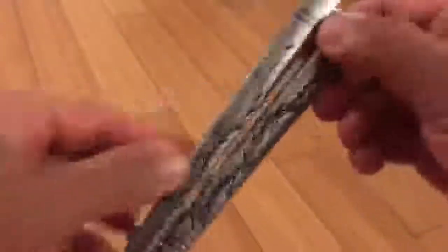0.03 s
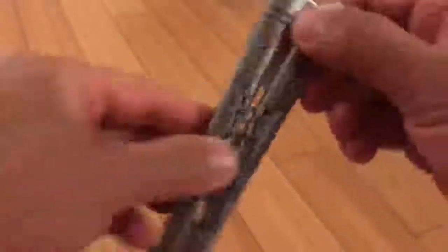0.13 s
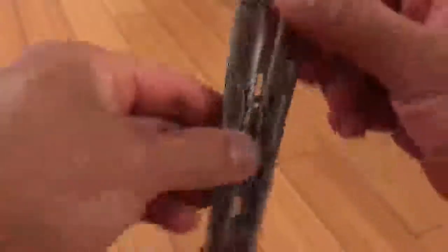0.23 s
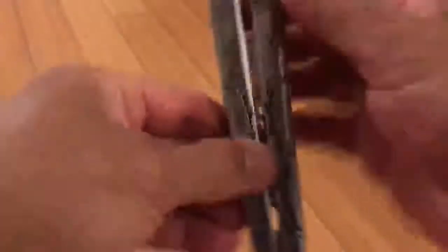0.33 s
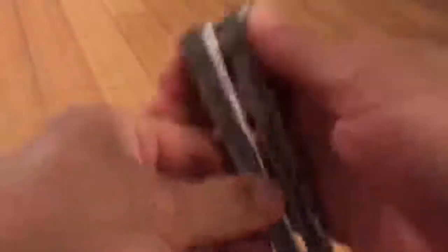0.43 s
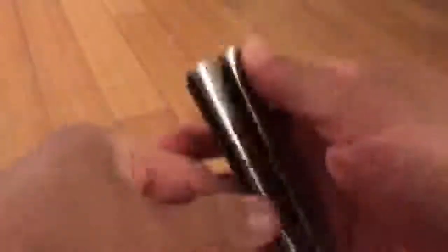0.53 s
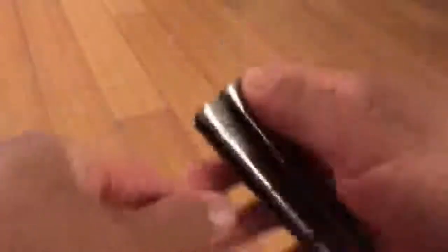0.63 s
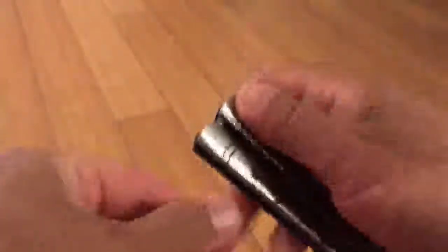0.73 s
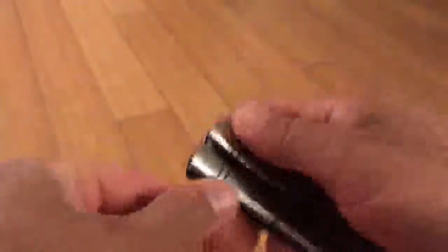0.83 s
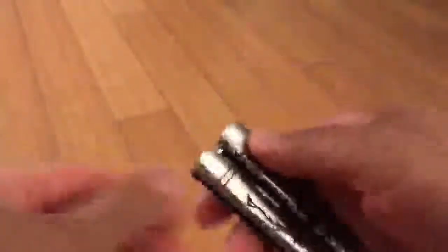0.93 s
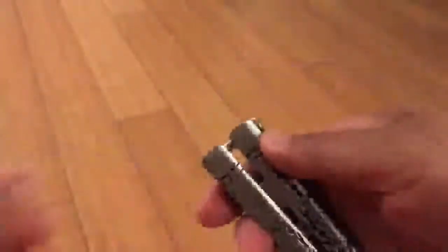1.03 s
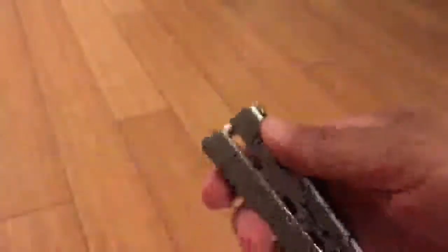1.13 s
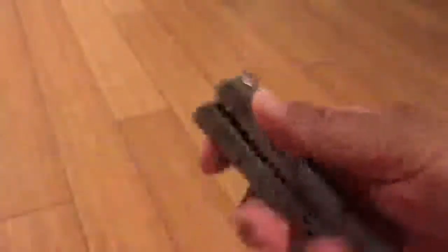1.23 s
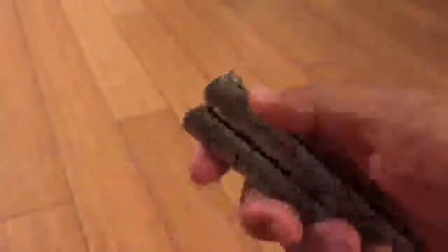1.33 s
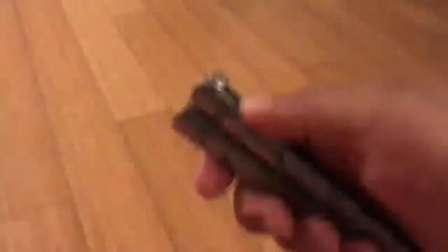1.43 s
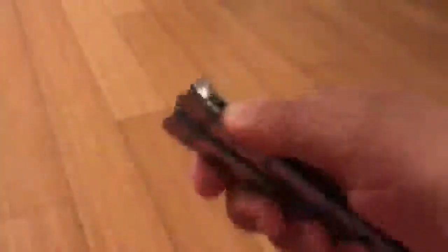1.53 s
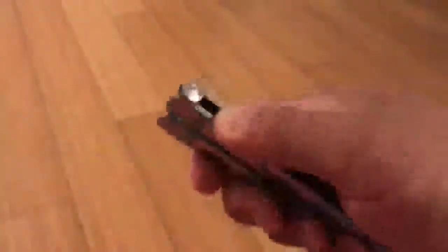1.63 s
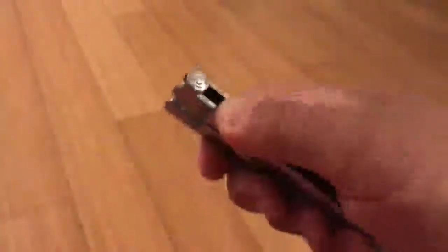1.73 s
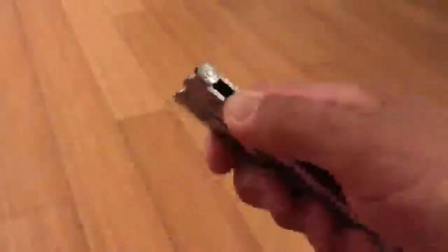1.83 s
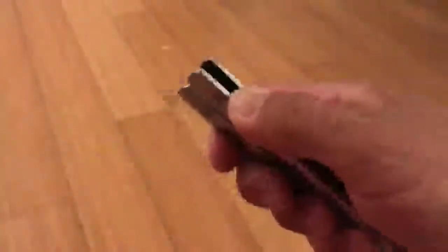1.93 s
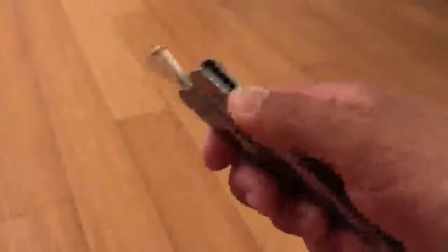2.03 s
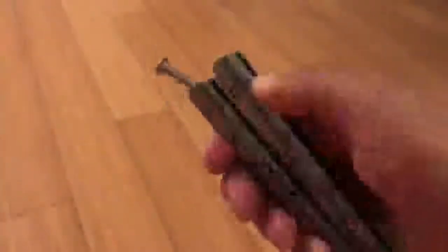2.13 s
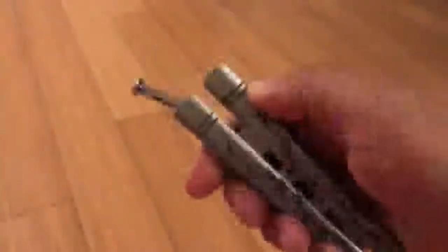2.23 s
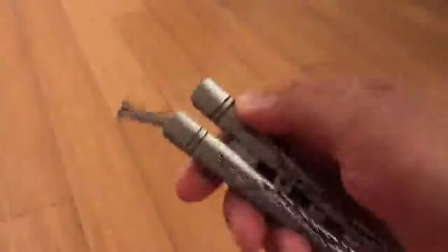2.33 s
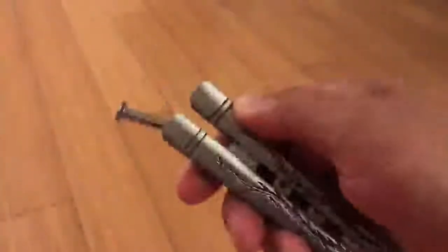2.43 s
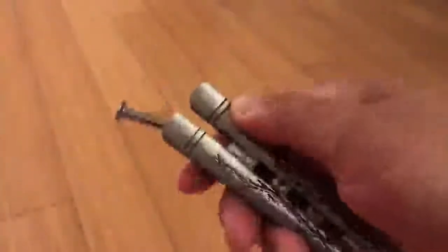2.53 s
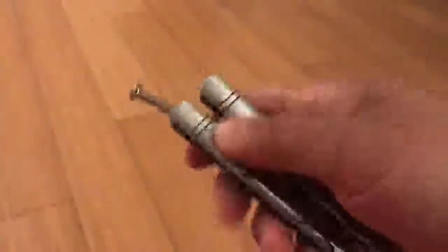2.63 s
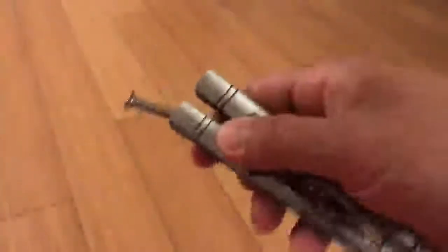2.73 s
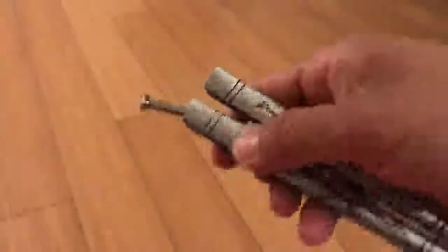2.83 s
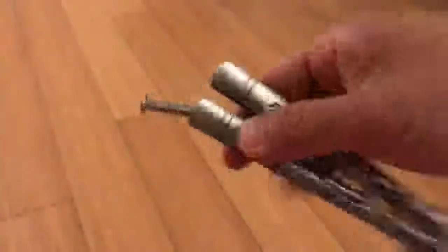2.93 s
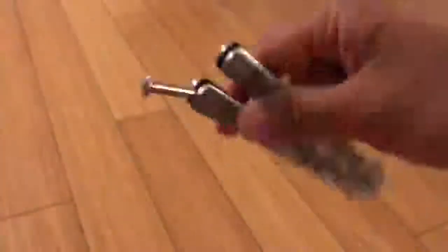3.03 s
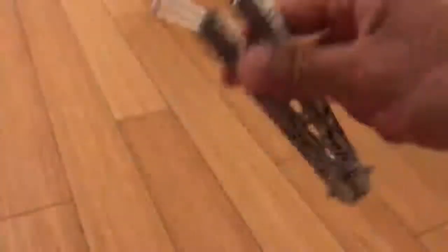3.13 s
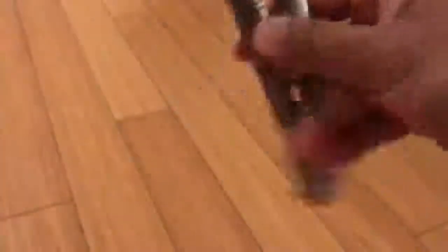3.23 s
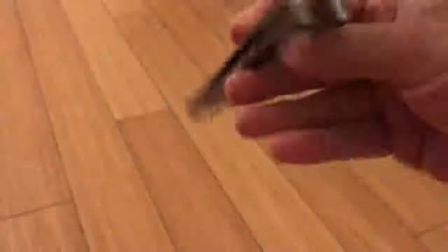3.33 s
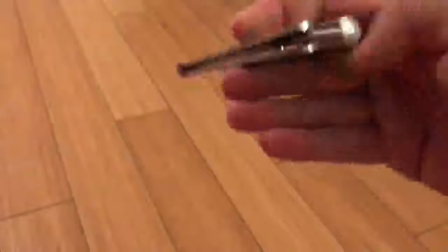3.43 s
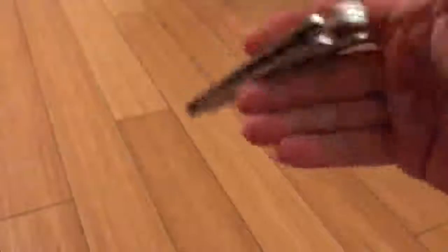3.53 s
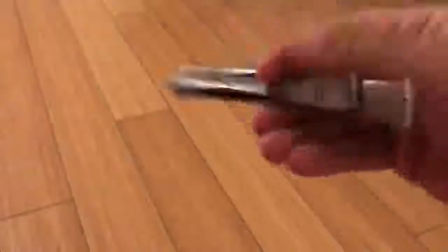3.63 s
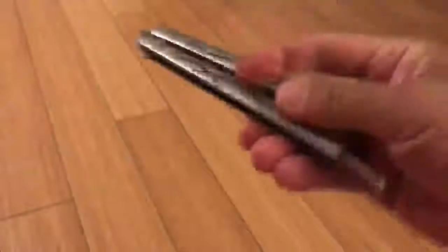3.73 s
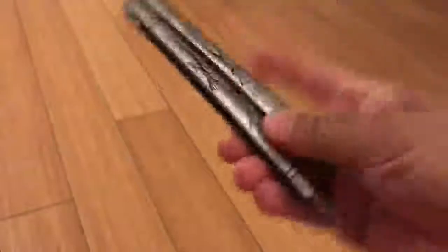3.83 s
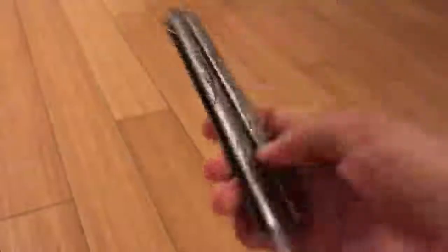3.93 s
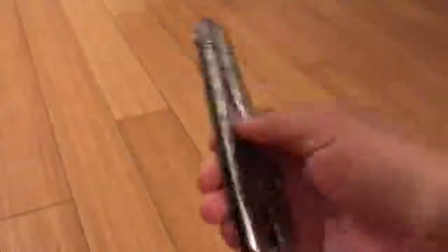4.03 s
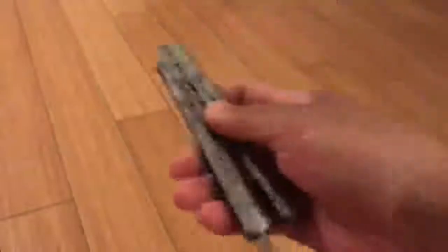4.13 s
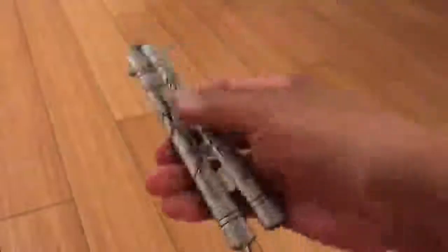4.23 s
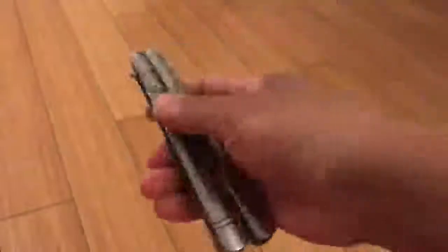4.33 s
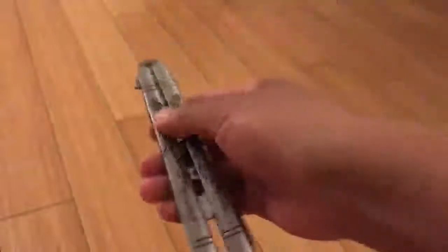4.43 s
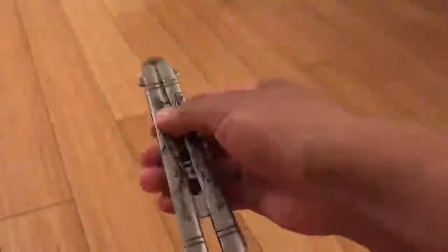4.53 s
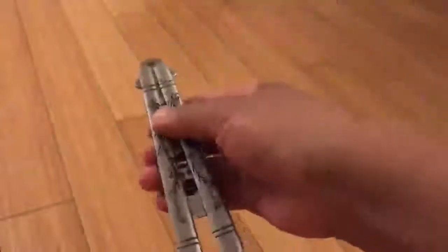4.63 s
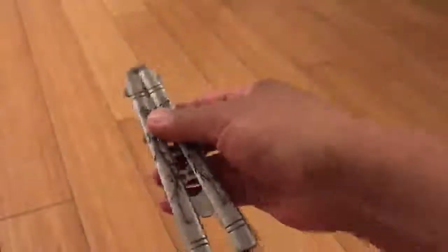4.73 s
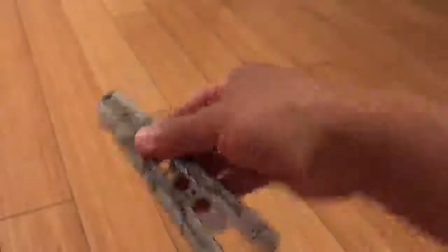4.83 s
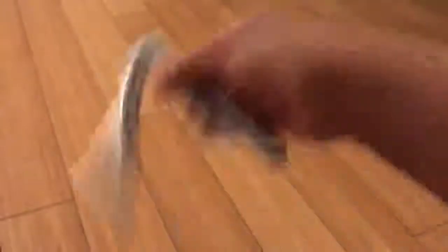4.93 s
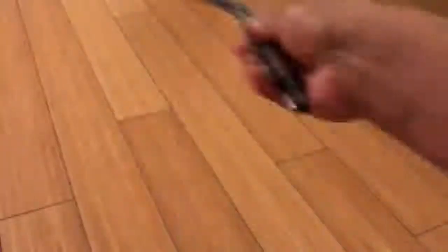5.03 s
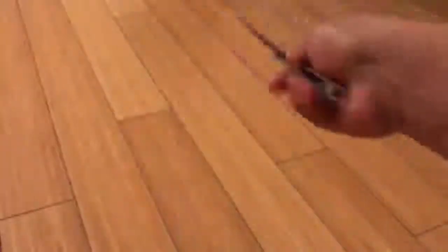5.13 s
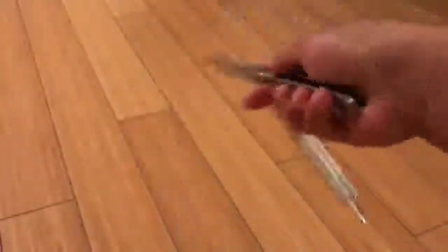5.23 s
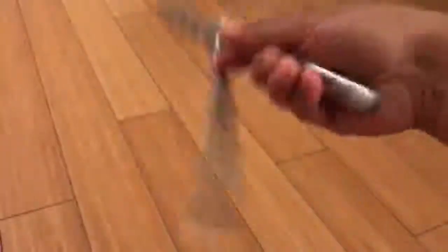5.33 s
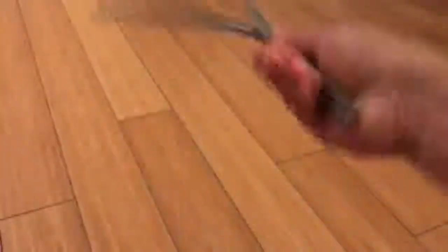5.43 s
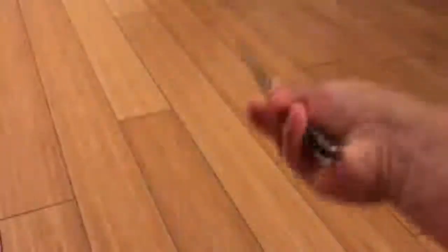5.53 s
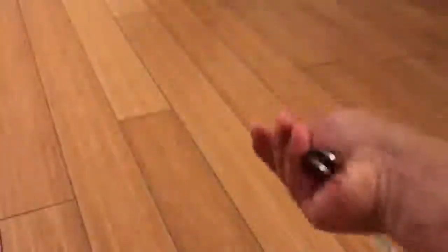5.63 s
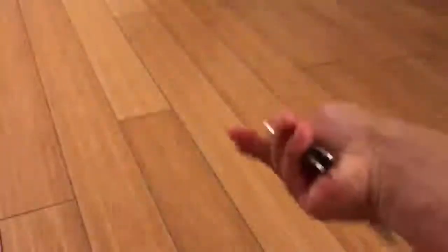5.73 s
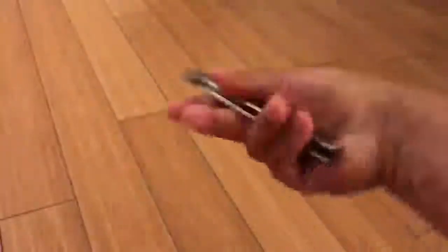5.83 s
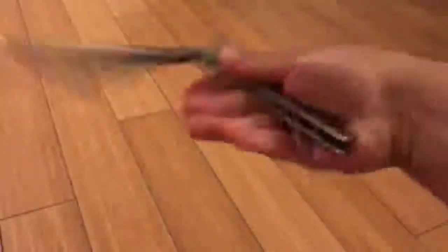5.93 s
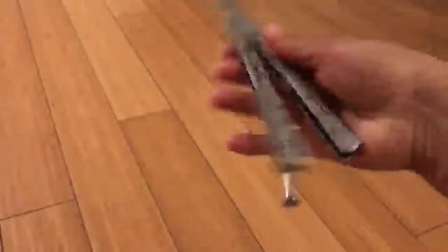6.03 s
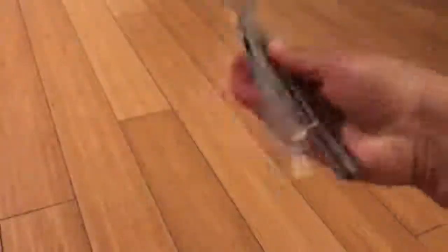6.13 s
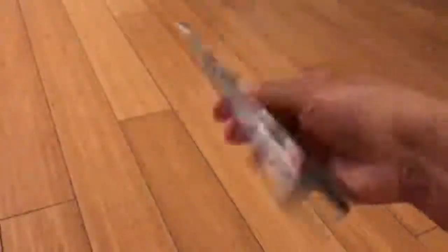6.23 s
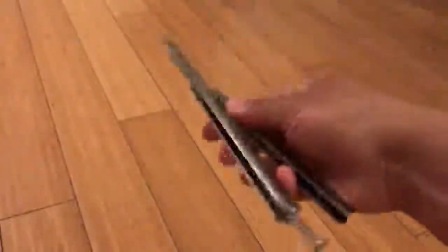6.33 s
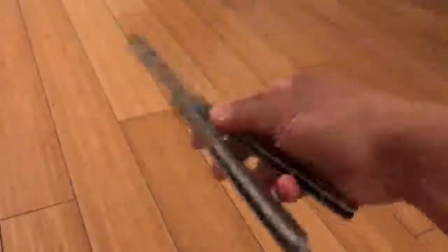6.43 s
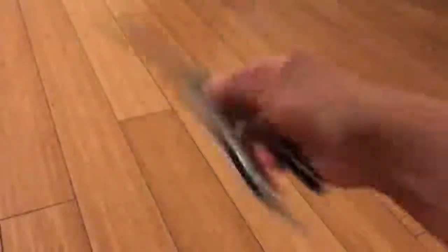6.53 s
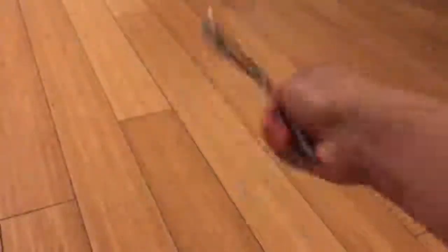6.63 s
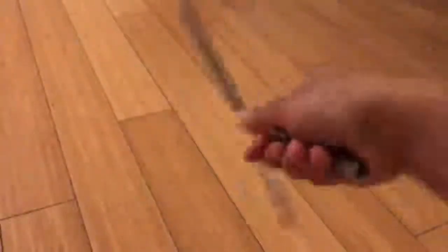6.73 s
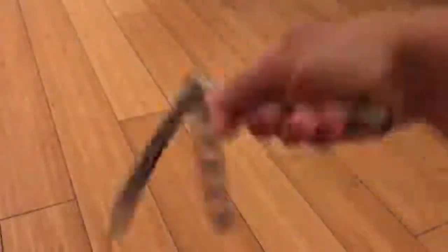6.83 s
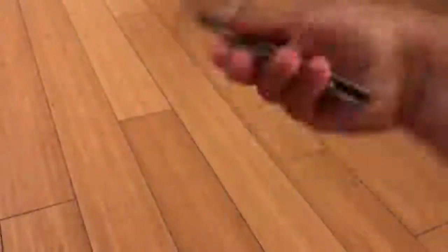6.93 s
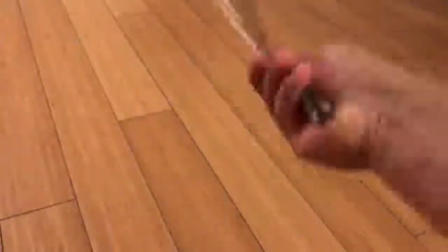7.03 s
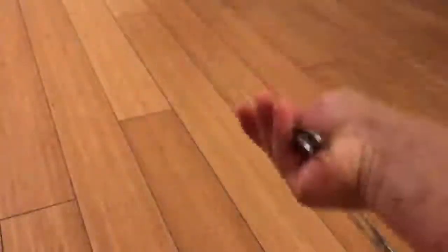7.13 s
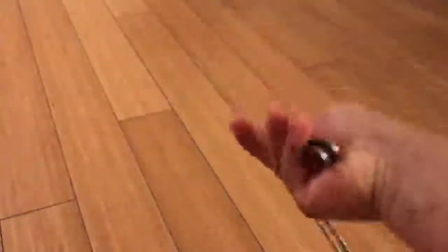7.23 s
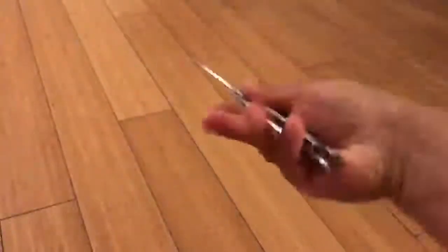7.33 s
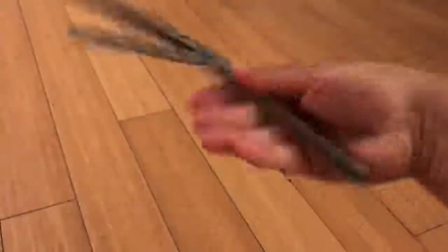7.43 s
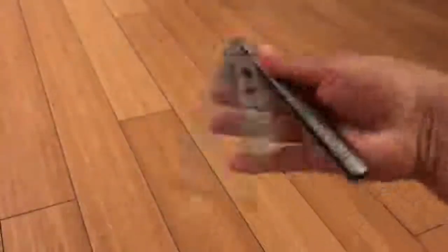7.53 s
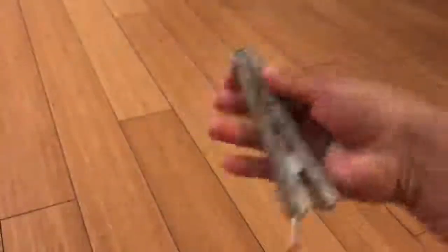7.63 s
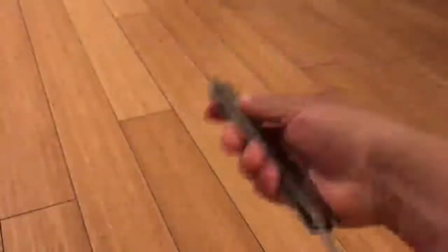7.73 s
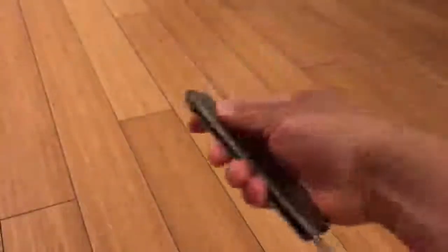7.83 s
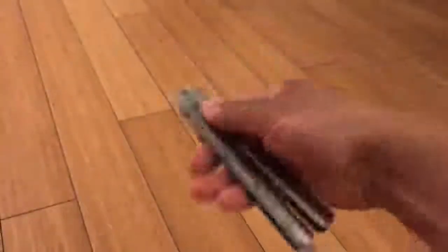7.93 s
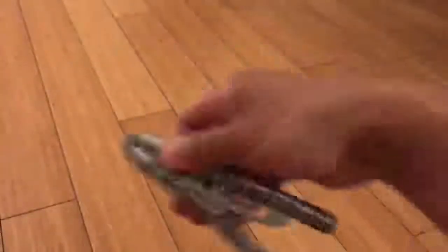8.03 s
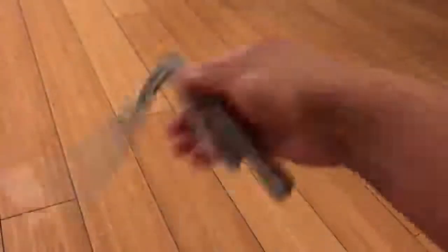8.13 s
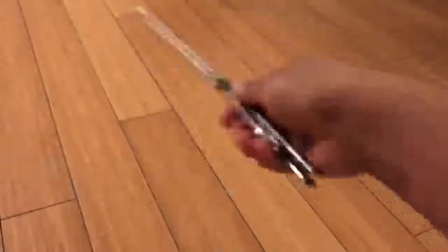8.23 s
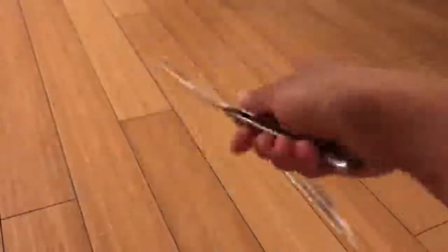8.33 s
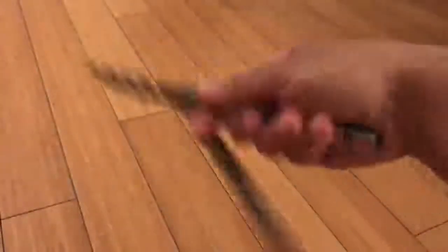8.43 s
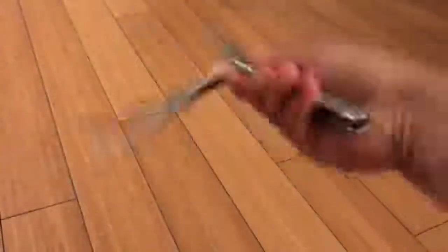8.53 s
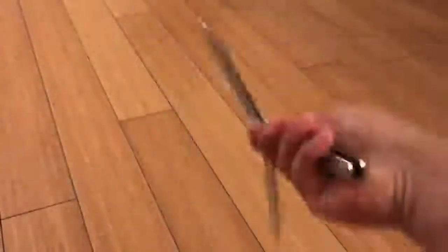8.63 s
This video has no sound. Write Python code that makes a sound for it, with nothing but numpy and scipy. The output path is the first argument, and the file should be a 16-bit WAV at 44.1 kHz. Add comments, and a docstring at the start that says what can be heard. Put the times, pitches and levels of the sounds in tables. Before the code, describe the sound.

Faint hum and finger rubbing on metal, a quick latch rattle, light ticks, then bursts of bright, dry steel clacks from flipping hinged handles.

```python
"""A steel practice butterfly knife is turned over, unlatched and flipped in one hand in a quiet room.
A faint hum, fingers rubbing the steel and short narrow-band tones run from the start; faint knocks and a dull
thud come near 1.5 s, then a quick flurry of knocks at 2 s: chattering contacts that ring damped modes.
Lighter knocks follow, then hard slams from 5.3 s on with a few more thuds between; the blade buzzes as
fading contacts after the slams at 5.3 and 7.2 s, and the last rub grows louder."""
import sys
import numpy as np
from scipy import signal
from scipy.fft import rfft, irfft
from scipy.io import wavfile
from scipy.ndimage import uniform_filter1d

SR = 44100
rng = np.random.default_rng(int(sys.argv[2]) if len(sys.argv) > 2 else 0)


def put_to_file(sound):
    """Save the sound as 16-bit audio at rate SR, in the file named by the first command-line argument."""
    columns = np.atleast_2d(sound).T  # one column per channel
    safe = np.clip(columns, -1, 1)
    whole_steps = np.round(safe * 32767)
    wavfile.write(sys.argv[1], SR, whole_steps.astype(np.int16))


N = 383669

# room noise spectrum: hz, level_db
AIR_SPECTRUM = [(12, -17), (25, -23.5), (50, 1.5), (113, 3.5), (163, -6), (301, -1.5), (513, -16),
                (574, -11), (698, -16.5), (1760, -24.5), (2910, -31), (4940, -41), (6360, -43),
                (7730, -51.5), (14700, -35), (16000, -36.5)]
AIR_DB = -58
# fuzzy hum bands: hz, pole_width_hz, level_db
HUM_BANDS = [(83, 30, -63.5), (122.5, 13.5, -64), (197.6, 5.9, -67), (279, 110, -75)]
# decay of the room: hz, t60_s
ROOM_DECAY = [(300, 0.34), (1500, 0.32), (3500, 0.22), (8000, 0.3), (15000, 0.21)]
ROOM_DB = -12.5
LATE_DB, LATE_T60_S = -15.5, 0.81  # weaker, slower second slope
# resonant bands that stand out of the tail: hz, width_hz, level_db (against the tail)
TAIL_BANDS = [(2740, 510, -0.5), (3660, 740, -8.5), (5460, 290, -7), (6670, 110, -1), (8980, 120, -6.5),
              (12800, 700, -6.5), (15400, 600, -3.5)]
EDGE_HZ = 16000

# hand shifting on the steel: time_s, level_db
RUB_LEVEL = [(0, -70.5), (.2, -68), (1.1, -69.5), (1.9, -71.5), (2.3, -61.5), (2.7, -70), (3.3, -70),
             (4.3, -67), (4.85, -70), (5.1, -64), (5.5, -60.5), (6.0, -67), (6.5, -65), (7.1, -60.5),
             (7.95, -61.5), (8.2, -60.5), (8.5, -53.5), (8.7, -53)]
# colour of the friction hiss: hz, level_db
FRICTION_SPECTRUM = [(700, 7.5), (2200, 7), (3200, 7.5), (4500, 4.5), (6400, 4.5), (8300, 1.5),
                     (11000, -0.5), (15500, -1.5), (16000, -24.5)]
RUB_TILT_DB_PER_OCTAVE, SLIDE_TILT_DB_PER_OCTAVE = -0.5, 5.5
# single light slides of a finger: start_s, length_s, level_db
FINGER_SLIDES = [(0.053, 0.23, -67), (0.358, 0.053, -60.5), (0.605, 0.2, -62), (0.947, 0.2, -68),
                 (1.2, 0.12, -69), (1.735, .06, -65), (2.764, 0.049, -64), (3.142, 0.097, -59),
                 (3.28, 0.2, -60), (3.522, 0.093, -59), (4.0, 0.11, -64), (4.41, 0.072, -60),
                 (5.594, 0.13, -52.5), (6.122, 0.24, -55), (8.39, 0.044, -47)]
SLIDE_RISE_S, SLIDE_FADE_DB = 0.018, -13.5
# modes fed by the rubbing: hz, level_db (against the rub)
RUBBED_MODES = [(2230, -19), (2950, -13), (3700, -20), (4300, -15), (5400, -20), (6400, -15), (7000, -25),
                (8300, -20)]
STRAND_WIDTH_HZ, STRAND_SLOWNESS_S, STRAND_SWING_DB, STRAND_DRIFT_SHARE = 280, .05, 5, .03
STRAND_STEP_S = .01
# friction whistles, latch ringing, a slam ringing on: start_s, length_s, level_db, pitch_hz
NARROW_TONES = [(0.238, 0.062, -70, 2150), (2.042, 0.16, -50, 7030), (2.07, 0.1, -56.5, 2290),
                (2.077, 0.019, -63, 915), (2.2, 0.019, -65, 1530), (2.457, 0.02, -55, 5400),
                (2.762, 0.022, -60, 2290), (3.049, 0.071, -67.5, 2250), (3.228, 0.084, -66, 8180),
                (3.304, 0.055, -68, 2070), (3.336, 0.26, -71, 8160), (3.725, 0.11, -71, 3770),
                (3.831, 0.02, -64, 1570), (4.18, 0.043, -66.5, 8120), (4.197, 0.085, -71, 2040),
                (5.334, 0.26, -59, 8400), (7.533, .03, -63, 10300)]
TONE_FADE_DB, TONE_GRAIN_DB = -6, 3

# dull thuds: start_s, level_db, pitch_hz, t60_s, rumble_db, wood_db, wood_centre_hz
DULL_THUDS = [(1.493, -14.5, 273, 0.038, -21, -20, 600), (1.514, -27.5, 140, 0.07, -33, -26, 1100),
              (1.524, -31.5, 221, 0.013, -24, -9, 1300), (4.979, -39.5, 155, 0.043, -6.5, -6, 950),
              (5.926, -29, 199, 0.021, -14, -17, 1010), (6.0735, -35, 206, 0.015, -1.5, 1.5, 1250),
              (7.2519, -31.5, 303, 0.016, -5, -5.5, 1040), (7.587, -36.5, 236, 0.046, -15, -13, 810),
              (8.433, -22.5, 150, 0.016, -20, -12.5, 1400)]
THUD_RISE_S = .0022  # the low ring swells late
THUD_AROUND_DB = 3  # farther off, so more comes from the walls
# woody knock in a thud: hz, level_db, t60_s
WOOD_MODES = [(601, 5.5, 0.022), (963, -4, 0.0139), (1388, 5, 0.017), (1800, 1.5, 0.024),
              (2170, -16.5, 0.016)]
WOOD_FALL_DB = -18  # one octave off the centre; grows with octaves squared
WOOD_UNEVEN_DB, WOOD_DETUNE_SHARE, WOOD_RISE_S = 3.5, .04, 0.0028
CRACK_DB, CRACK_T60_S, CRACK_LOW_HZ, CRACK_HIGH_HZ = 3.5, 0.034, 450, 1990

# blade buzzing on the handle after hard slams: first_contact_s, strength_db, clink_hz
BLADE_BUZZES = [(5.337, -54, 2820), (7.264, -55, 3120), (7.264, -53, 3740)]
BUZZ_CONTACTS, BUZZ_PERIOD_S, BUZZ_JITTER_S = 13, .0142, .001
BUZZ_FADE_DB_PER_CONTACT, BUZZ_UNEVEN_DB, BUZZ_DETUNE_SHARE = -1.0, 3.5, .035
BUZZ_CHATTER_MS, BUZZ_BODY_DB, BUZZ_UPPER_DB = 5, -5, -12
# steel on steel: time_s, strength_db, chatter_ms, clink_hz, clink_db, upper_db (last two against the treble)
STEEL_KNOCKS = [(1.222, -60, 6.8, 3550, -15, -10), (1.497, -70, 6, 1735, 17, -24),
                (1.525, -64, 4, 2980, -2, -24), (1.783, -64, 1.3, 2390, 2, -26),
                (2.029, -36, 5.4, 3140, -16, -9), (2.0395, -37.5, 14, 2980, -9.5, -19),
                (2.0447, -33.5, 6.7, 2870, -5, -13), (2.0685, -47, 3, 2960, -12, -10),
                (2.0725, -37.5, 3.6, 2750, -16, -8), (2.0758, -34.5, 5, 2800, -12, -9),
                (2.0907, -41, 19, 2950, -15, -14), (2.1066, -34.5, 7.2, 2860, -15, -6),
                (2.1264, -48, 8.4, 2940, -13, -8), (2.143, -38.5, 12, 2930, -13, -12),
                (2.1545, -41, 11, 2870, -9.5, -13), (2.194, -51, 4, 3240, -16, -8),
                (2.2018, -45, 4, 3010, -15, -14), (2.2065, -44.5, 4.7, 2980, -12, -4),
                (2.7604, -57.5, 9.2, 2820, -3.5, -17), (2.907, -62, 8.5, 2320, -4, -20),
                (2.9397, -63, 4.5, 3100, -0.5, -27), (3.0116, -64.5, 3.3, 2290, -6, -10),
                (3.172, -60, 4, 2970, -12, -6), (3.181, -60, 4, 4400, -12, -10),
                (3.345, -53, 8, 4100, -16, -5), (3.402, -57.5, 9.1, 4200, -8.5, -8),
                (3.414, -61.5, 6, 2300, -7, -10), (3.429, -63, 6, 4000, -8, -10),
                (3.655, -66, 5, 2750, -6, -8), (3.707, -64.5, 4, 2300, -10, -18),
                (3.8343, -40, 3.1, 3500, -27, -15), (3.959, -58, 0.98, 3600, -4, -11),
                (4.032, -55, 4.4, 2850, -18, -18), (4.1046, -39, 7.4, 2900, -24, -17),
                (4.1899, -62, 5.5, 2180, -10, -10), (4.2394, -43, 8.8, 2200, -22, -19),
                (4.4357, -58, 4.9, 2400, -24, -11), (5.0985, -43.5, 2.7, 3200, -24.5, -6),
                (5.1286, -49, 5, 3320, -27.5, -19), (5.171, -48, 7.3, 2750, -7.5, -8),
                (5.194, -47, 3.3, 3000, -10, -9), (5.2172, -52.5, 5.2, 2830, -11, -7.5),
                (5.258, -49.5, 7.5, 2760, -25.5, -14), (5.3086, -16, 4.4, 3125, -21.5, -2),
                (5.3222, -23.5, 13, 2816, -17.5, -12), (5.328, -39, 4.2, 2590, -2, -17.5),
                (5.5198, -44, 14, 3780, -22, -14), (5.6197, -38.5, 3.5, 2720, -25, -21),
                (5.6845, -55, 5.8, 2500, -13, -4), (5.7786, -42.5, 8.8, 3000, -11.5, -9.5),
                (5.9274, -60.5, 6.9, 2750, -14, -10), (5.9785, -57, 6.7, 3500, -18, -6),
                (6.0147, -60, 5, 3080, -23.5, -10), (6.0563, -21, 2.8, 3050, -5.5, -3.5),
                (6.0677, -32, 5.9, 3020, -4.5, -8), (6.074, -20, 5.4, 3220, -10, -3),
                (6.0838, -23, 13, 3300, -33, -15), (6.179, -36, 5, 2950, -24, -9),
                (6.231, -40, 15, 2790, -23, -8.5), (6.3272, -46.5, 3.9, 2780, -12.5, -6),
                (6.5922, -23.5, 7.5, 2830, -13.5, 3), (6.6824, -55, 6.2, 3270, -9, -10),
                (6.704, -40, 10, 3000, -18.5, -12), (6.722, -48, 5.8, 2950, -14, -9),
                (6.895, -56, 3.2, 2670, -10, -16), (6.907, -32, 3.4, 2520, -23.5, -15),
                (6.9224, -37, 7.1, 2280, -27, -7), (6.955, -46, 13, 2900, -19, -8),
                (6.9865, -31, 4.5, 3050, -19, 10), (6.9893, -23, 5.2, 3065, -4.5, 6),
                (7.036, -55, 4, 3060, -19, -6.5), (7.063, -55.5, 5, 3100, -23.5, -7),
                (7.137, -48, 11, 2920, -19, -8), (7.1474, -47, 4.6, 3220, -25, -8),
                (7.236, -12, 3.4, 3840, -28, -9.5), (7.2495, -25, 15, 2990, -21.5, -10),
                (7.5313, -50, 21, 2830, -16.5, -14), (7.5927, -22.5, 5.1, 3310, -10.5, 0.5),
                (7.601, -26.5, 3.5, 3200, -16, -12), (7.63, -32, 6, 3360, -31, 0),
                (7.6362, -23, 5.4, 3900, -24, -13), (7.6465, -32, 4.8, 2830, -20, -13),
                (7.651, -26, 2.1, 3600, -21, -17), (7.6559, -7.5, 39, 3070, -38, -43),
                (7.6661, -17, 1, 3400, -32, -19), (7.668, -20, 8.2, 2970, -23.5, -7.5),
                (7.6756, -32, 3.7, 2750, -25, -20), (7.7453, -48, 5, 2930, -18, -3),
                (7.7594, -42, 3.3, 3230, -23, -18), (7.782, -43, 5, 3050, -17.5, -19),
                (7.86, -56.5, 5.9, 3000, -6, 6), (8.3414, -27, 4.8, 2950, -23, -12),
                (8.391, -45, 4.4, 3370, -34, -5), (8.4366, -14.5, 5.2, 3370, -27.5, -8),
                (8.4498, -21.5, 7.6, 2800, -22, -13), (8.66, -47, 4.6, 2920, -16, -8)]
# modes of handles and blade, damped by the hand: hz, level_db, t60_s
STEEL_MODES = [(760, 3, 0.0046), (1350, 3.5, 0.0055), (1850, -8.5, 0.0022), (2306, -11, 0.04),
               (3960, 5.5, 0.0045), (4600, 7, 0.005), (5365, 3.5, 0.013), (5920, 6, 0.013),
               (6410, 18.5, 0.0051), (6920, 16.5, 0.0033), (7570, 7.5, 0.0041), (8130, 9.5, 0.0063),
               (9460, -19, 0.0023), (10020, -2.5, 0.011), (10620, 2.5, 0.0071), (11450, -1, 0.01),
               (12200, 5, 0.0029), (12800, -9, 0.0026), (14460, 5, 0.0025), (15500, -10, .007)]
# corners of the blow's colour: gap_hz, middle_hz, upper_hz, treble_hz, top_hz
COLOUR_HZ = [4750, 7560, 8380, 9470, 12760]
MIDDLE_DB, MIDDLE_SHARE = -3.5, 0.41  # the middle modes follow the body in part
TOP_DB, TOP_SHARE = -0.5, 0.32  # a hard-rung upper mode goes with a brighter top
GRIP_UNEVEN_DB, GRIP_DETUNE_SHARE = 2.5, .01  # each blow wakes the modes in other shares
CLINK_DB, CLINK_T60_S = 14.5, 0.036  # lowest strong mode; grip sets its pitch, seating chokes it
HIGH_HZ, HIGH_WIDTH_HZ, HIGH_DB = 8440, 45, 44.5  # narrow tone, symmetric in time around each blow
CLINK_AROUND_DB, HIGH_AROUND_DB = -7.5, -17  # the clear tones are weaker in the tail
UPPER_AROUND_SHARE, UPPER_WIDTH_HZ = .6, 700  # share of a loud upper mode missing from the tail
ONSET_S, LEAD_SAMPLES = .003, 640


def gain_of(db):
    """Amplitude factor of a level in dB."""
    return 10 ** (np.asarray(db) / 20)


def evened(x):
    """Scale to unit RMS."""
    return x / np.sqrt(np.mean(x ** 2) + 1e-20)


def read(points, hz):
    """Interpolate a spectrum over log frequency."""
    f, value = np.transpose(points)
    return np.interp(np.log(hz + 1), np.log(f + 1), value)


def add(mix, start_s, sound):
    """Add a sound in place, cut at the end of the mix."""
    part = mix[round(start_s * SR):][:len(sound)]
    part += sound[:len(part)]


def noise(field_db, size):
    """Random short-time spectra under a dB field made from frequency and time."""
    hz = np.fft.rfftfreq(size, 1 / SR)[:, None]
    t = np.arange(4 * N // size + 5) * size / 4 / SR
    a, b = rng.standard_normal((len(t), len(hz), 2)).T
    spectra = (a + 1j * b) * gain_of(field_db(hz, t))
    return signal.istft(spectra, nperseg=size, noverlap=3 * size // 4)[1][:N]


def fuzzy_tone(hz, width_hz, count):
    """A tone whose level and phase wander within a narrow band."""
    r = np.exp(-np.pi * width_hz / SR)
    a, b = rng.standard_normal((count, 2)).T
    wander = a + 1j * b
    for _ in range(2):
        wander = signal.lfilter([1 - r], [1, -r], wander)
    carrier = np.exp(2j * np.pi * np.cumsum(hz * np.ones(count)) / SR)
    return evened((wander * carrier).real)


def air():
    """Steady room noise with narrow bands of hum."""
    hum = sum(gain_of(db) * fuzzy_tone(hz, width_hz, N) for hz, width_hz, db in HUM_BANDS)
    hush = noise(lambda hz, t: read(AIR_SPECTRUM, hz) + 0 * t, size=2048)
    return gain_of(AIR_DB) * evened(hush) + hum


def with_tail_bands(x):
    """Resonant bands that make some pitches stand out of the tail."""
    bands = (gain_of(db) * signal.lfilter(*signal.iirpeak(hz, hz / width_hz, fs=SR), x)
             for hz, width_hz, db in TAIL_BANDS)
    return x + sum(bands)


def room(x):
    """Sparse taps of random sign after a short gap, each band dying at its own speed."""
    taps = np.zeros(SR)
    slots = np.arange(260, len(taps) - 12, 12)
    at = slots + rng.integers(0, 12, len(slots))
    taps[at] = rng.choice([-1., 1.], len(at))
    hz, t, spectra = signal.stft(taps, SR, nperseg=128)
    early = gain_of(-60 * t / read(ROOM_DECAY, hz)[:, None])
    late = gain_of(LATE_DB - 60 * t / LATE_T60_S)
    tail = signal.istft(spectra * (early + late), SR, nperseg=128)[1]
    return signal.fftconvolve(x, tail / np.linalg.norm(tail))[:N]


def hiss(tilt_db_per_octave):
    """Patchy friction hiss in the colour of the steel."""
    def field_db(hz, t):
        patches = uniform_filter1d(rng.standard_normal((len(t), len(hz))), 20, 0)
        patches = evened(uniform_filter1d(patches, 4, 1)).T
        tilt_db = np.log2((hz + 50) / 6000) * tilt_db_per_octave
        return read(FRICTION_SPECTRUM, hz) + tilt_db + 2 * patches
    return evened(noise(field_db, size=256))


def strands():
    """Each mode sings faintly, comes and goes on its own, and drifts in pitch as the grip moves."""
    t, steps = np.arange(N) / SR, np.arange(0, N / SR + 1, STRAND_STEP_S)
    r = np.exp(-STRAND_STEP_S / STRAND_SLOWNESS_S)
    slow = signal.lfilter([1], [1, -r], rng.standard_normal((len(RUBBED_MODES), 2, len(steps))))
    out = np.zeros(N)
    for (hz, db), pair in zip(RUBBED_MODES, slow):
        swing, drift = [np.interp(t, steps, evened(curve)) for curve in pair]
        tone = fuzzy_tone(hz * (1 + STRAND_DRIFT_SHARE * drift), STRAND_WIDTH_HZ, N)
        out += gain_of(db + STRAND_SWING_DB * swing) * tone
    return out


def fingers():
    """A continuous dull rub of changing level that wakes the modes, and brighter single slides that fade."""
    t, slides = np.arange(N) / SR, np.zeros(N)
    for start_s, length_s, db in FINGER_SLIDES:
        u = np.arange(0, length_s, 1 / SR)
        ramps = np.minimum(np.minimum(u, length_s - u) / SLIDE_RISE_S, 1)
        add(slides, start_s, ramps * gain_of(db + SLIDE_FADE_DB * u / length_s))
    rub = gain_of(np.interp(t, *np.transpose(RUB_LEVEL))) * (hiss(RUB_TILT_DB_PER_OCTAVE) + strands())
    return rub + slides * hiss(SLIDE_TILT_DB_PER_OCTAVE)


def narrow_tones():
    """Uneven narrow-band tones that fade: friction whistles, latch ringing, a slam ringing on."""
    out = np.zeros(N)
    for start_s, length_s, db, hz in NARROW_TONES:
        tone = fuzzy_tone(hz, width_hz=140.0, count=SR)[:round(length_s * SR)]
        grain = evened(uniform_filter1d(rng.standard_normal(SR), size=200))[:len(tone)]
        fade_db = TONE_FADE_DB * (np.linspace(0, 1, len(tone)) - .5)
        level = gain_of(db + fade_db + TONE_GRAIN_DB * grain)
        add(out, start_s, level * tone * signal.windows.tukey(len(tone), .5))
    return out


def thuds():
    """A soft blow: a short low ring, a woody knock with a dry crack, and a dull rumble that dies more slowly."""
    out, t = np.zeros(N), np.arange(8000) / SR
    size = (len(DULL_THUDS), len(t))
    rumble_band = signal.butter(1, [45, 200], "bandpass", fs=SR)
    crack_band = signal.butter(2, [CRACK_LOW_HZ, CRACK_HIGH_HZ], "bandpass", fs=SR)
    puffs = signal.lfilter(*rumble_band, rng.standard_normal(size))
    cracks = signal.lfilter(*crack_band, rng.standard_normal(size))
    uneven = rng.standard_normal((len(DULL_THUDS), 2, len(WOOD_MODES), 1))
    wood_hz, mode_db, wood_t60_s = np.array(WOOD_MODES).T[:, :, None]
    for thud, puff, crack, (share, detune) in zip(DULL_THUDS, puffs, cracks, uneven):
        start_s, db, hz, t60_s, rumble_db, wood_db, centre_hz = thud
        off_centre_db = WOOD_FALL_DB * np.log2(wood_hz / centre_hz) ** 2
        level = gain_of(mode_db + off_centre_db + WOOD_UNEVEN_DB * share - 60 * t / wood_t60_s)
        modes = level * np.sin(2 * np.pi * wood_hz * (1 + WOOD_DETUNE_SHARE * detune) * t)
        knock = modes.sum(0) + gain_of(CRACK_DB - 60 * t / CRACK_T60_S) * evened(crack)
        ring = gain_of(-60 * t / t60_s) * np.sin(2 * np.pi * hz * t)
        rumble = gain_of(rumble_db - 60 * t / (4.86 * t60_s)) * evened(puff)
        low = (1 - np.exp(-t / THUD_RISE_S)) ** 2 * (ring + rumble)
        wood = (1 - np.exp(-t / WOOD_RISE_S)) * gain_of(wood_db) * knock
        add(out, start_s, gain_of(db) * (low + wood))
    return out


def buzzes():
    """Nearly evenly spaced, fading contacts, each off in time, strength and pitch, as rows like the knocks."""
    uneven = rng.standard_normal((len(BLADE_BUZZES), BUZZ_CONTACTS, 3))
    rows = []
    for (first_s, db, hz), contacts in zip(BLADE_BUZZES, uneven):
        for k, (a, b, c) in enumerate(contacts):
            time_s = first_s + k * BUZZ_PERIOD_S + BUZZ_JITTER_S * c
            strength_db = db + k * BUZZ_FADE_DB_PER_CONTACT + BUZZ_UNEVEN_DB * a
            clink_hz = hz * (1 + BUZZ_DETUNE_SHARE * b)
            rows.append((time_s, strength_db, BUZZ_CHATTER_MS, clink_hz, BUZZ_BODY_DB, BUZZ_UPPER_DB))
    return rows


def knocks():
    """A swarm of tiny contacts rings the modes; gives the direct sound and what goes out to the walls."""
    direct, around = np.zeros(N), np.zeros(N)
    t, bins = np.arange(2048) / SR, np.fft.rfftfreq(4096, 1 / SR)
    mode_hz, mode_db, t60_s = np.array(STEEL_MODES).T[:, :, None]
    blows = [*STEEL_KNOCKS, *buzzes()]
    grips = rng.standard_normal((len(blows), 2, len(STEEL_MODES), 1))
    size = (len(blows), 1024)
    swarms = rng.standard_normal(size) * gain_of(2 * rng.exponential(1, size))
    radiates = 1 / (1 + (1500 / (bins + 1)) ** 2.53)  # a small object sends out little bass
    # real spectrum: symmetric in time
    narrow = gain_of(HIGH_DB) * np.exp(-.5 * ((bins - HIGH_HZ) / HIGH_WIDTH_HZ) ** 2)
    lead = np.exp(-2j * np.pi * bins * LEAD_SAMPLES / SR)  # room for the high tone's first half
    for blow, (detune, share), swarm in zip(blows, grips, swarms):
        time_s, strength_db, chatter_ms, clink_hz, clink_db, upper_db = blow

        level = gain_of(mode_db + GRIP_UNEVEN_DB * share - 60 * t / t60_s)
        modes = level * np.sin(2 * np.pi * mode_hz * (1 + GRIP_DETUNE_SHARE * detune) * t)
        low_db = clink_db / 2 - 5.0  # the broad low modes change less than the clink
        middle_db = MIDDLE_DB + MIDDLE_SHARE * clink_db
        top_db = TOP_DB + TOP_SHARE * upper_db
        colour_db = [low_db, (low_db + middle_db) / 2, middle_db, upper_db, 0, top_db]
        colour = gain_of(read(np.transpose([[clink_hz, *COLOUR_HZ], colour_db]), bins))
        ring = rfft(modes.sum(0), 4096) * colour * radiates

        u = (t - ONSET_S) * 1000 / max(chatter_ms, .5)
        before, after = np.minimum(u, 0), np.maximum(u, 0)
        # swells, holds, then the parts seat
        chatter = swarm * np.exp(before / 0.12 - after ** 2.1)[:1024]
        struck = ring * rfft(chatter / np.linalg.norm(chatter), 4096)

        # the two clear tones follow the blow as a whole, not the single contacts
        clink_level = gain_of(CLINK_DB + clink_db - 60 * t / CLINK_T60_S)
        clink_level = clink_level * np.exp(before / 0.15) * (0.3 + np.exp(-abs(u) ** 4))
        handles = np.sin(2 * np.pi * clink_hz * t) + 0.5 * np.sin(2 * np.pi * 1.08 * clink_hz * t)
        clink = rfft(clink_level * handles, 4096)
        centre_s = ONSET_S + chatter_ms * 0.66 / 1000
        high = gain_of(upper_db) * narrow * np.exp(-2j * np.pi * bins * centre_s)

        start_s = time_s - .0028 - LEAD_SAMPLES / SR
        gain = gain_of(strength_db) * lead
        add(direct, start_s, irfft(gain * (struck + clink + high)))
        upper_bell = 1 + ((bins - HIGH_HZ) / UPPER_WIDTH_HZ) ** 2
        upper_cut_db = UPPER_AROUND_SHARE * max(upper_db + 3, 0) / upper_bell
        # over all directions the contacts' comb evens out
        to_walls = ring / gain_of(upper_cut_db) + gain_of(CLINK_AROUND_DB) * clink
        to_walls = to_walls + gain_of(HIGH_AROUND_DB) * high
        add(around, start_s, irfft(gain * to_walls))
    return direct, around


def scene():
    """Sum of the direct sounds, their room tail, the friction, the narrow tones and the air."""
    direct, around = knocks()
    dull = thuds()
    tail = gain_of(ROOM_DB) * room(with_tail_bands(around) + gain_of(THUD_AROUND_DB) * dull)
    return (direct + dull + tail + fingers() + narrow_tones() + air())[None]


def record(dry):
    """Steep low-pass at the upper band edge."""
    low_pass = signal.firwin(511, EDGE_HZ, window=("kaiser", 9), fs=SR)
    return signal.oaconvolve(dry, low_pass[None], "same")


dry = scene()
out = record(dry)
put_to_file(out)
```